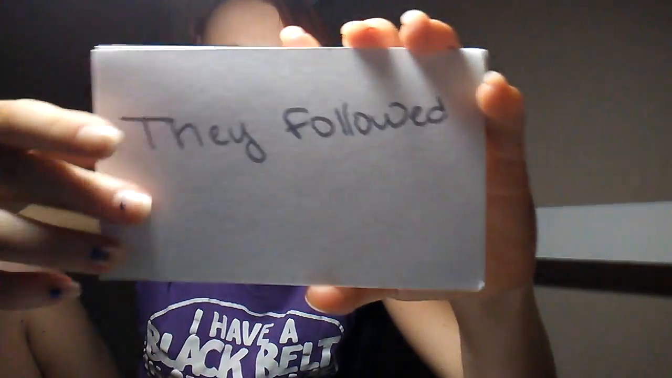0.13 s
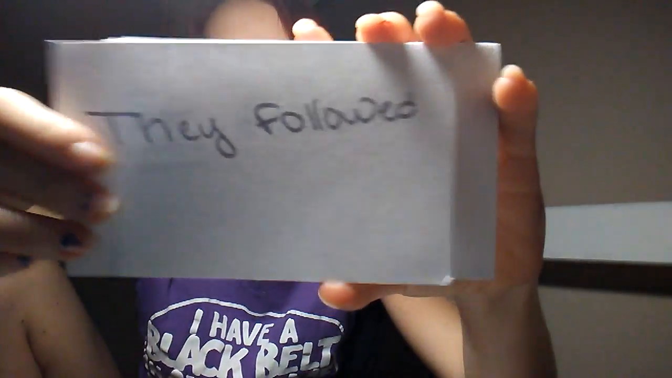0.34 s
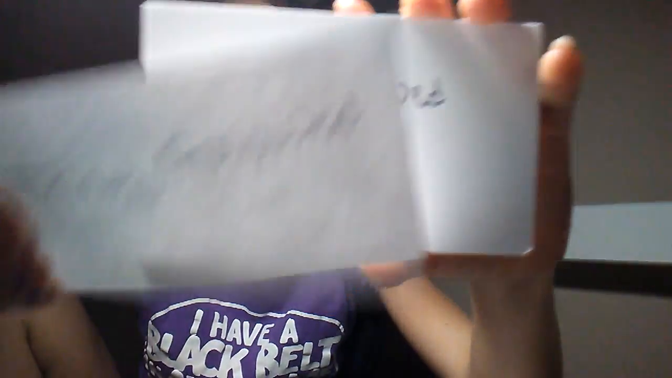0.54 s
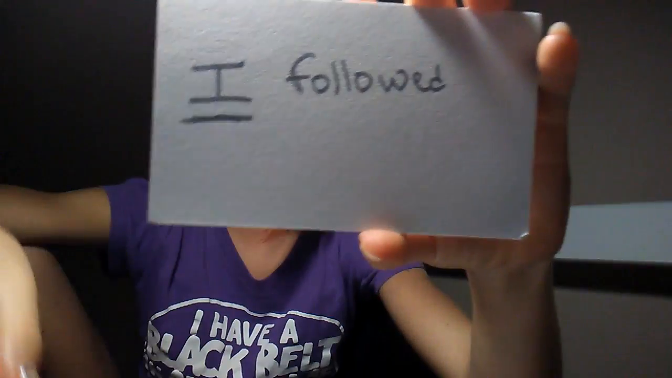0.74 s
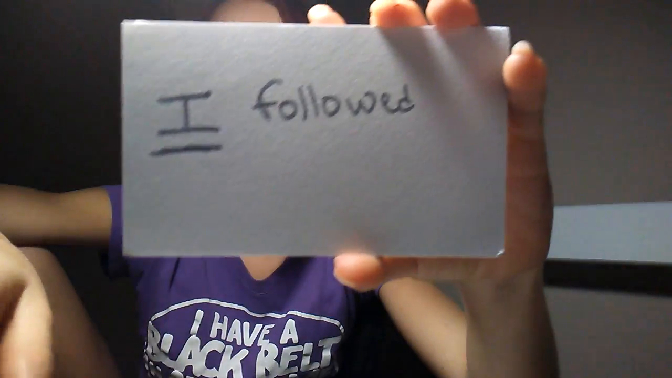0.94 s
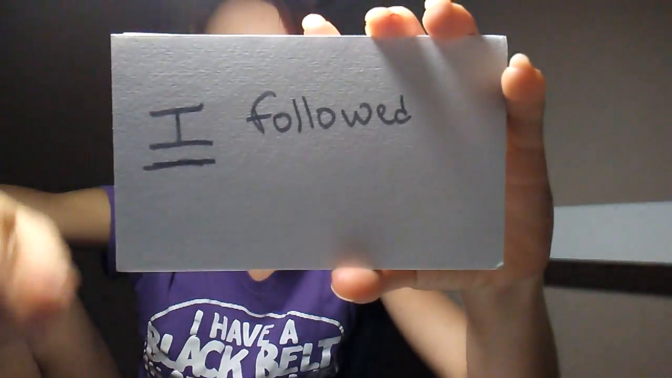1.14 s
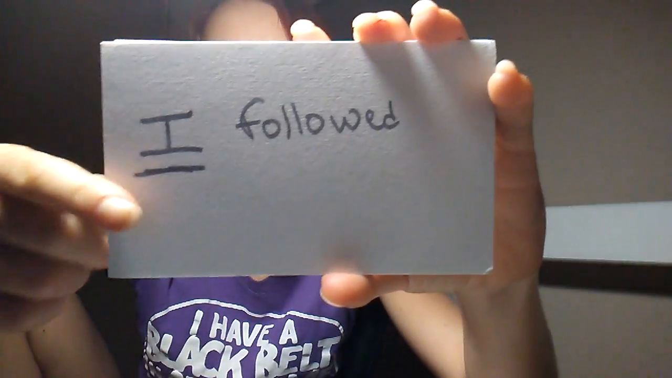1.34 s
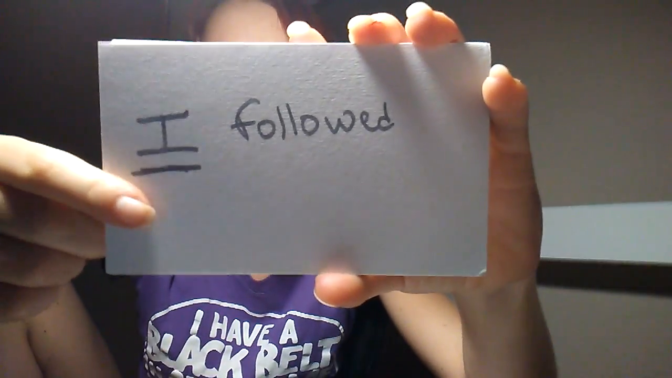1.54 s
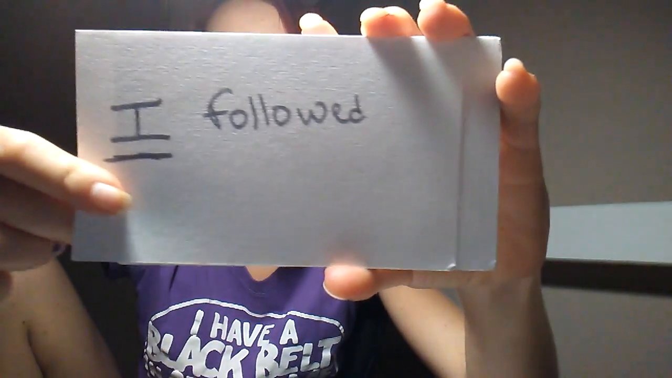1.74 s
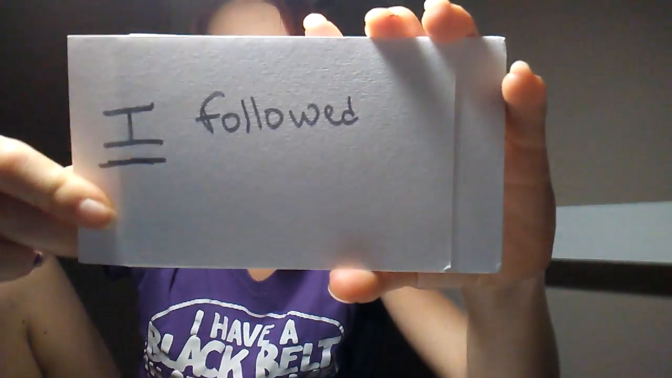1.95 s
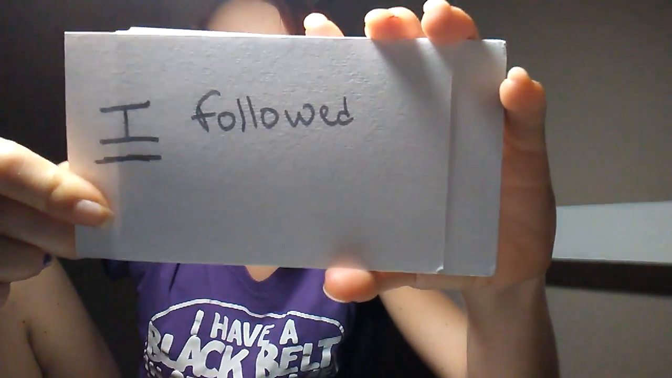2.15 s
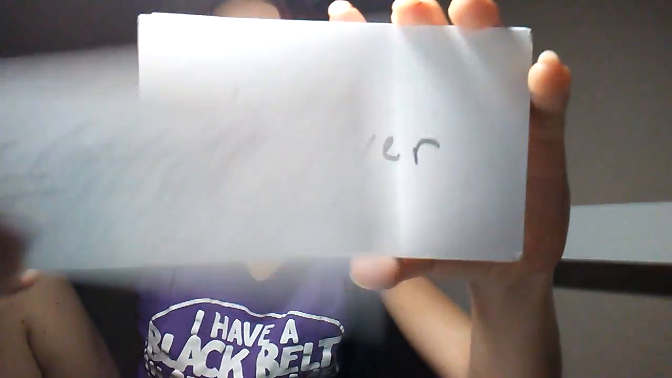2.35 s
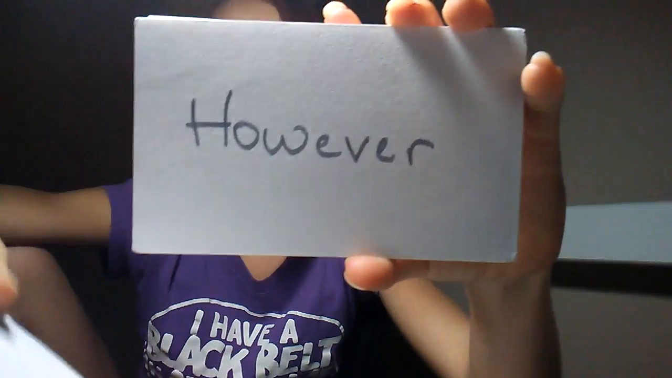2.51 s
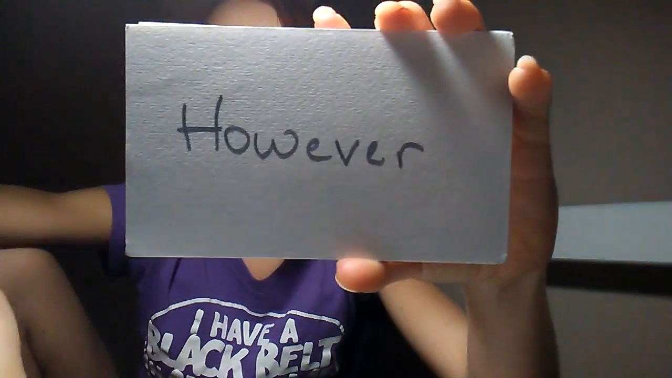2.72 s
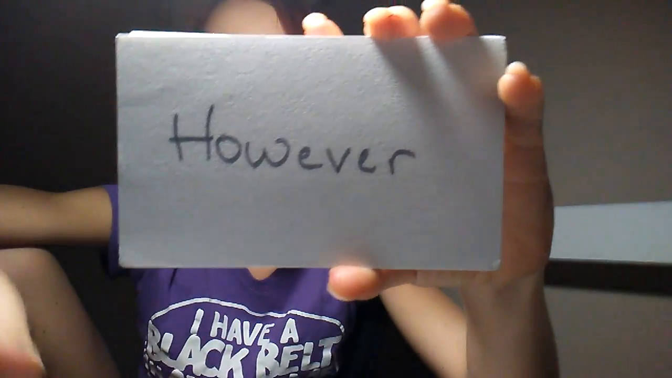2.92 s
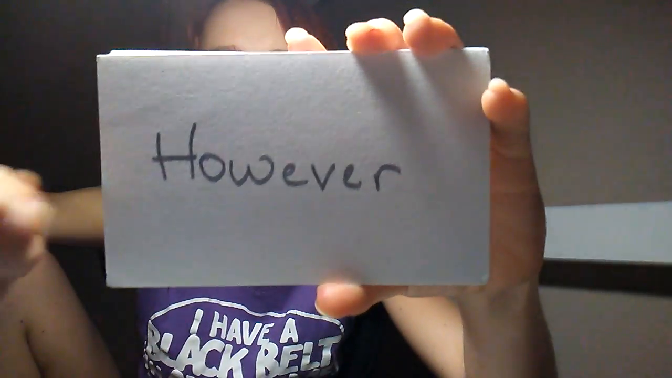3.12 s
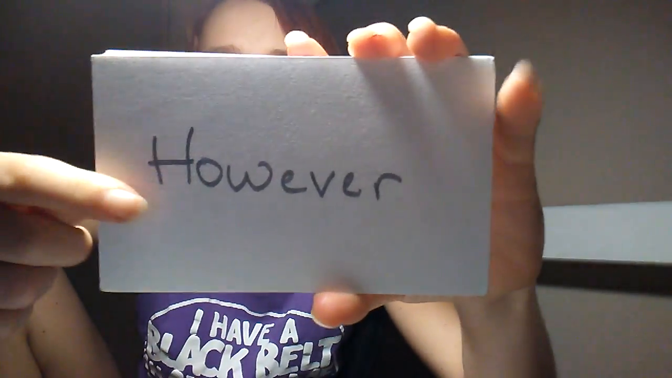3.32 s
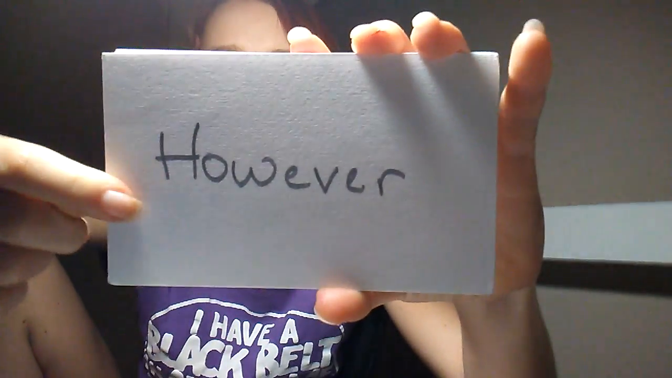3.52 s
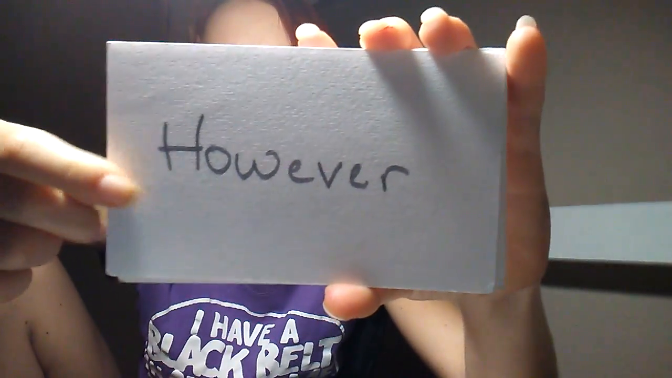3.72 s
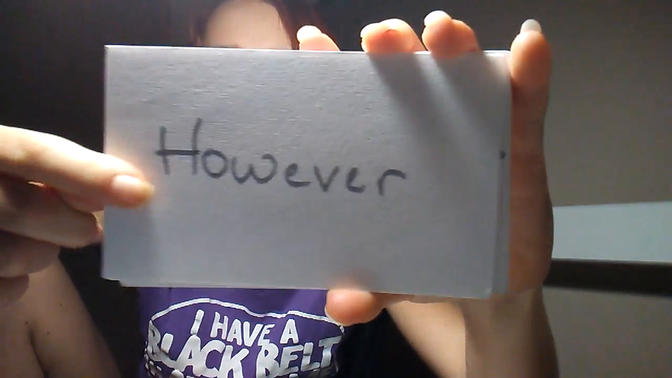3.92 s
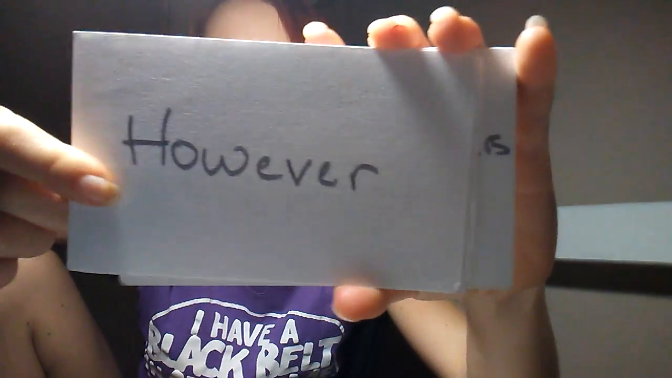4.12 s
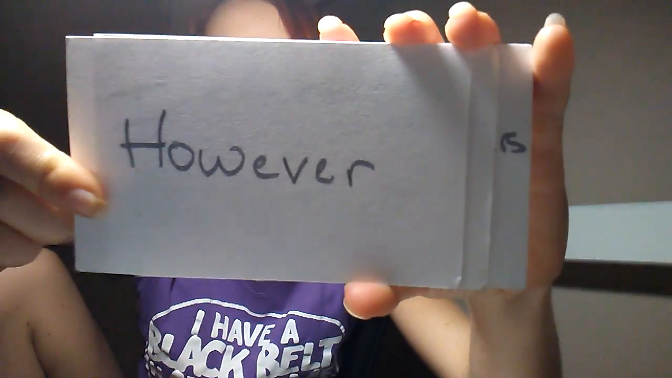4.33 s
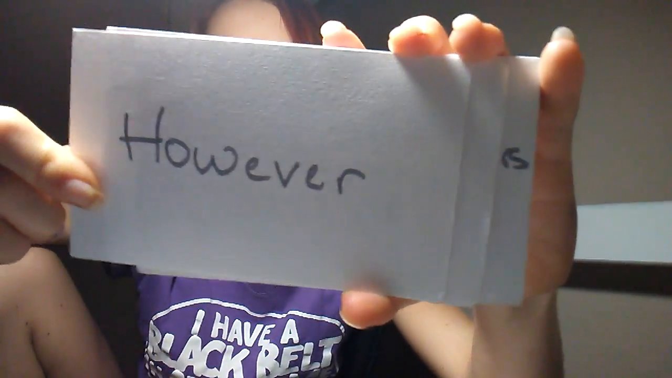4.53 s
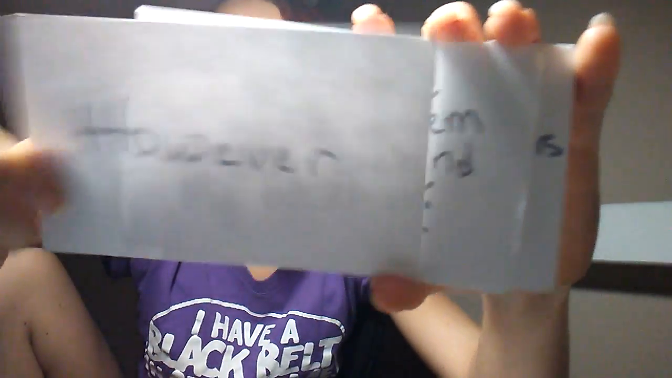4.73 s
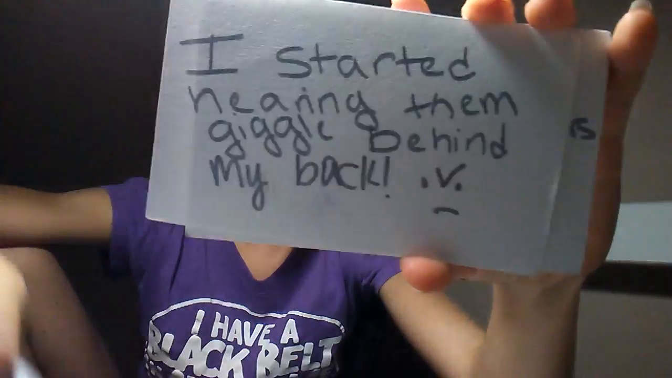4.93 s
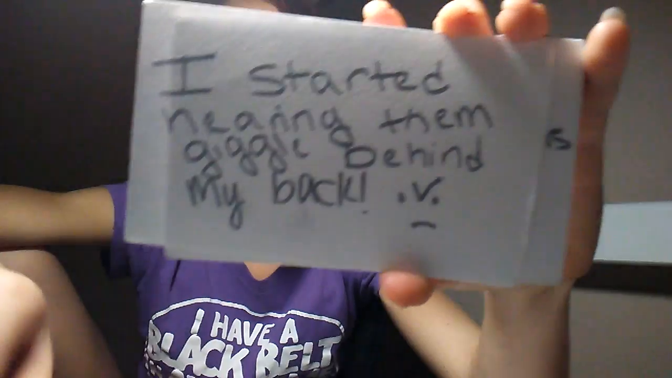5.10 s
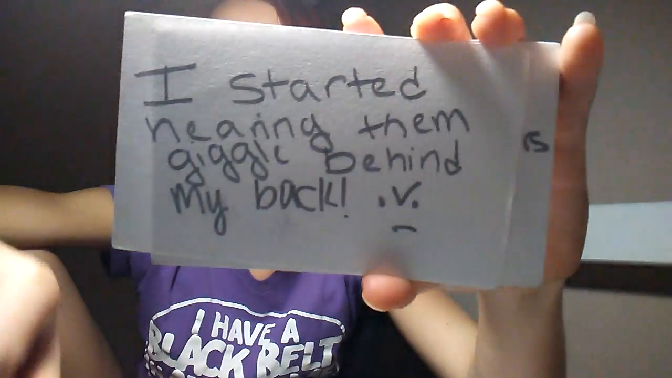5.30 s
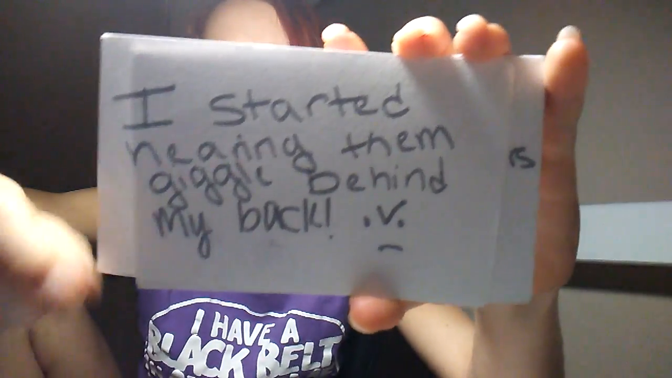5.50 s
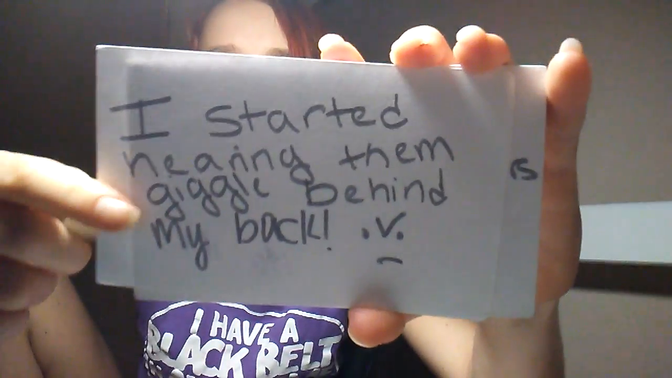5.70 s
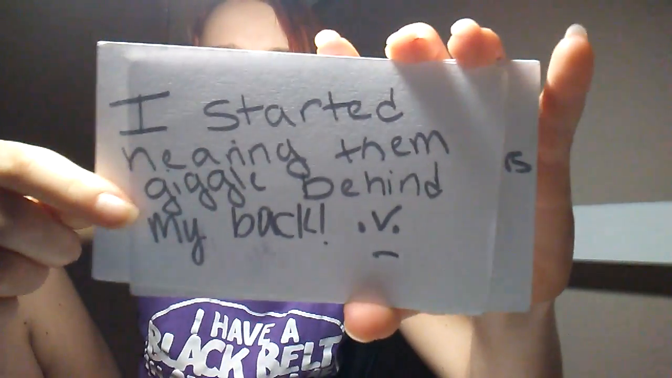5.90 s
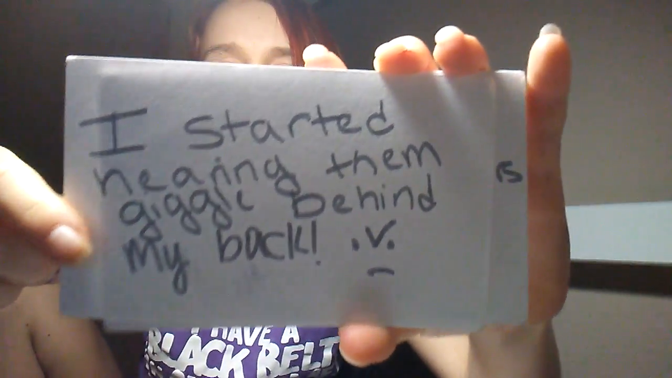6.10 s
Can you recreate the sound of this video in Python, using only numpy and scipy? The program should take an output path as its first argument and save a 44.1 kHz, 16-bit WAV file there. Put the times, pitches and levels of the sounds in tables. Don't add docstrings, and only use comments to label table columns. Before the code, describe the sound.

Close to a small microphone in a quiet, hissing room, fingers brush a stack of stiff paper cards. One drags with a dry crackle and snaps free, then a lull with faint rustling. A second run of slides ends in two quick snaps and low desk thuds. After a quieter pause, a third card snaps loudest, followed by squaring knocks and fading rustle.

```python
import sys
import numpy as np
from scipy import signal
from scipy.io import wavfile
from scipy.ndimage import uniform_filter1d

SR = 44100
rng = np.random.default_rng(int(sys.argv[2]) if len(sys.argv) > 2 else 0)


def gain_from_db(level_db):
    decades = np.asarray(level_db, float) / 20
    return 10 ** decades


def inscribe(sig):
    pcm = np.round(np.clip(np.atleast_2d(sig).T, -1, 1) * 32767)
    wavfile.write(sys.argv[1], SR, pcm.astype(np.int16))


N = 271347

# frequency in Hz, density in dB per Hz.
FIBRE_SPECTRUM = [(2600, -30.5), (3600, -21.5), (4050, -14.5), (4450, -18), (4800, -10.5), (5100, -10),
                  (5550, -8.5), (5850, -0.5), (6150, -6.5), (6600, -11), (6950, -14.5), (7450, -23),
                  (8640, -31.5), (11700, -43)]
# start in seconds, peak in dB,
# low ring in Hz, high ring in Hz, decay t60 in seconds.
BUCKLING_SNAPS = [(0.5814, -27.5, 534, 897, 0.048), (0.586, -22.5, 492, 1415, 0.029),
                  (.589, -20, 737, 1827, 0.029), (.593, -20.5, 529, 1930, 0.018),
                  (0.5955, -21.5, 915, 1770, 0.027), (2.3828, -34, 630, 1200, 0.023),
                  (2.3917, -36, 378, 1124, 0.045), (2.4, -28, 286, 900, 0.014),
                  (2.789, -26, 510, 1280, .01), (2.791, -30.5, 920, 1850, 0.013),
                  (2.795, -28, 519, 490, 0.032), (4.7925, -42.5, 655, 2045, .03),
                  (4.8116, -25.5, 1220, 1986, 0.029), (4.8139, -30, 407, 1560, 0.023)]


def evened(x):
    return x / np.sqrt(np.mean(x ** 2) + 1e-20)


def read(points, hz):
    f, value = np.transpose(points)
    return np.interp(np.log(hz + 1), np.log(f + 1), value)


def colour(x, points, size=4096):
    gain_db = np.maximum(read(points, np.fft.rfftfreq(size, 1 / SR)), -100)
    log_gain = np.log(gain_from_db(gain_db))
    full = np.concatenate([log_gain, log_gain[-2:0:-1]])
    taps = np.fft.ifft(np.exp(np.conj(signal.hilbert(full)))).real
    return signal.oaconvolve(x, taps / np.linalg.norm(taps))[:len(x)]


def add(mix, s, sound):
    part = mix[round(s * SR):][:len(sound)]
    part += sound[:len(part)]


def crackle(per_s, spread_db, clump_db):
    slow_noise = uniform_filter1d(rng.standard_normal(N), size=250)
    clumps = evened(uniform_filter1d(slow_noise, size=250))
    sizes = gain_from_db(spread_db * np.minimum(rng.exponential(1, N), 4) + clump_db * clumps)
    clicks = rng.standard_normal(N) * (rng.random(N) < per_s / SR)
    return evened(sizes * clicks)


def patchy(x, patchy_db, size=256):
    z = signal.stft(x, nperseg=size)[2]
    patches = uniform_filter1d(rng.standard_normal(z.shape), size=8, axis=1)
    patches = evened(uniform_filter1d(patches, size=2, axis=0))
    return evened(signal.istft(z * gain_from_db(patchy_db * patches), nperseg=size)[1][:N])


def swells(peak_s, db, rise_s, fall_s, rounding=1):
    swell_db = 20
    power, t = np.zeros(N), np.arange(N) / SR
    for s, level_db, rise, fall in zip(peak_s, db, rise_s + 0.0031, fall_s + 1e-3):
        near = slice(max(round((s - 3 * rise) * SR), 0), round((s + 3 * fall) * SR))
        late = t[near] - s
        distance = np.maximum(late / fall, -late / rise)
        power[near] += gain_from_db(level_db - swell_db * distance ** rounding) ** 2
    return uniform_filter1d(np.sqrt(power), size=100)


def sliding():
    # peak in seconds,
    # level in dB, rise in seconds, fall in seconds, pressure in dB.
    drags = [(0.374, -51.5, 0.076, 0.087, -15.5), (0.42, -52.5, 0.019, 0.015, -1.5),
             (0.5, -61.5, 0.11, 0.27, -5), (0.578, -52.5, 0.041, 0.041, -10),
             (0.636, -49.5, 0.025, 0.018, -0.5), (1.695, -62.5, 0.0075, 0.11, -25),
             (1.755, -55, 0.035, 0.11, -12), (1.87, -63, 0.051, 0.075, -11),
             (2.305, -53.5, 0.045, .03, -9.5), (2.335, -47, 0.039, 0.032, -9),
             (2.365, -47.5, 0.03, 0.03, -11), (2.382, -47.5, 0.019, .012, -4),
             (2.398, -44, 0.01, 0.013, -1.5), (2.423, -57.5, .01, 0.014, 3), (2.45, -74.5, 0.033, 0.15, 2),
             (2.703, -52, 0.0069, 0.068, -5), (2.725, -55, .015, .03, 2), (2.752, -48.5, .02, .025, -1),
             (2.772, -45.5, 0.015, 0.029, -1.5), (2.795, -49, 0.013, 0.036, 3),
             (2.825, -58, .03, 0.04, -1.5), (4.05, -77, 0.16, 0.25, 0), (4.12, -68.5, 0.055, .08, -11),
             (4.265, -59.5, 0.14, 0.049, -11.5), (4.62, -63, 0.033, 0.32, -10.5),
             (4.75, -57.5, 0.16, 0.12, -12), (4.795, -49.5, 0.021, 0.063, -12),
             (4.845, -64.5, 0.059, 0.046, -4)]
    # peak in seconds, level in dB,
    # rise in seconds, fall in seconds, pressure in dB.
    brushes = [(0.1, -72, 0.016, .03, 1), (0.27, -71.5, 0.77, 0.044, -6), (0.77, -70, 0.14, 0.16, 0),
               (0.932, -62.5, 0.067, 0.099, -5.5), (1.028, -58.5, 0.0052, 0.13, -5.5),
               (1.174, -74, 0.073, 0.12, 0.5), (1.98, -52, 0.016, 0.023, -2), (2.03, -76.5, .05, 0.26, 2),
               (2.86, -70.5, .03, 0.22, 2), (3.752, -61.5, 0.016, 0.024, -17), (4.42, -71, .05, 0.46, -3),
               (5.066, -47.5, 0.012, 0.075, -5), (5.035, -63, 0.03, .04, 1),
               (5.18, -55.5, 0.03, 0.097, -0.5), (5.215, -63, .02, .03, 6), (5.288, -63.5, 0.037, 0.13, -6),
               (5.64, -74, 0.066, 0.28, 1)]
    # peak in seconds, level in dB,
    # rise in seconds, fall in seconds.
    flexes = [(0.27, -67.5, .25, 0.054), (0.425, -58, 0.029, 0.035), (0.53, -67, 0.37, .1),
              (0.596, -32, 0.022, 0.049), (.635, -38, .02, .02), (0.652, -42, .02, 0.017),
              (0.69, -64.5, .03, 0.21), (0.936, -54, 0.077, 0.091), (1.024, -56.5, .02, 0.21),
              (1.19, -62, .03, 0.11), (1.984, -60, .015, 0.042), (2.04, -72, .05, 0.13),
              (2.3, -62, 0.16, 0.27), (2.394, -33.5, 0.012, 0.035), (2.46, -64.5, .05, 0.74),
              (2.704, -53.5, 0.0084, 0.29), (2.797, -35.5, 0.008, 0.027), (2.785, -49, .01, .01),
              (1.78, -72, 0.087, 0.13), (2.86, -73, 0.044, .12), (3.072, -62.5, .003, 0.08),
              (4.3, -61.5, 0.084, 0.44), (4.417, -51, 0.024, 0.013), (4.5, -65.5, 0.24, 0.72),
              (4.7, -67, 0.19, 0.29), (4.815, -26, 0.0047, 0.021), (4.84, -49, .015, 0.029),
              (0.567, -37.5, 0.0058, 0.043), (5.035, -57, 0.022, .05), (4.89, -64, .05, 0.16),
              (5.072, -48, 0.033, 0.052), (5.015, -57.5, 0.0055, .15), (5.178, -45, 0.035, 0.088),
              (5.288, -57, 0.049, 0.063), (5.68, -65, 0.15, 0.12)]
    # frequency in Hz, density in dB per Hz.
    pressed_spectrum = [(880, -39), (1500, -15), (1930, -3), (2350, -13), (2750, -2), (3300, -1.5),
                        (4000, -3), (4420, -8), (4750, -11.5), (5000, -17), (6500, -35), (11000, -120)]
    # frequency in Hz, density in dB per Hz.
    body_spectrum = [(110, -21), (180, -5), (323, 2), (529, 2), (939, 0), (1270, -7), (1450, -12.5),
                     (2000, -13), (2600, -53.5), (4400, -120)]
    # frequency in Hz, density in dB per Hz.
    fast_spectrum = [(3000, -30), (4100, -10.5), (4500, -17.5), (4900, 1), (5400, -3), (6500, 0),
                     (7200, -8), (9000, -30.5)]

    slips = patchy(crackle(9000, 0.61, 0.67), patchy_db=1.8)
    fizz, scrape = np.zeros((2, N))
    for rows, rounding in (drags, 1.87), (brushes, 1):
        s, db, rise, fall, pressure_db = np.transpose(rows)
        fizz = np.hypot(fizz, swells(s, db, rise, fall, rounding))
        scrape = np.hypot(scrape, swells(s, db + pressure_db, rise, fall, rounding))
    wide = gain_from_db(-12.5) * (fizz * gain_from_db(46)) ** 0.25 * colour(slips, fast_spectrum)
    surface = gain_from_db(-4.5) * fizz * (colour(slips, FIBRE_SPECTRUM) + wide)
    pressed = gain_from_db(-4.0) * scrape * colour(slips, pressed_spectrum)
    rattle = patchy(crackle(2500, 1.77, 2.4), patchy_db=4.0, size=512)
    body = gain_from_db(-7.5) * swells(*np.transpose(flexes)) * colour(rattle, body_spectrum)
    return surface + pressed + body


def streaks():
    # middle in seconds, peak in dB, pitch in Hz, length in seconds.
    streak_table = [(.572, -53, 6000, 0.022), (0.576, -49, 5200, 0.011), (.586, -47, 5300, .01),
                    (0.628, -51, 3000, .025), (0.6393, -43, 6680, .008), (.64, -43, 5260, .012),
                    (0.641, -40, 2040, .008), (0.638, -42.5, 5850, 0.012), (.639, -40, 4480, .008),
                    (.641, -38, 2900, .008), (0.654, -45, 1996, .015), (.38, -50.5, 5880, .05),
                    (1.759, -60, 5900, .05), (1.795, -51, 5900, .012), (1.89, -58.5, 5800, .02),
                    (1.984, -52, 5850, 0.027), (2.3, -50, 5900, .025), (2.303, -54, 3720, 0.019),
                    (2.318, -46, 5200, 0.035), (2.342, -42, 4310, 0.01), (2.351, -46, 5480, .01),
                    (2.362, -44, 5200, 0.022), (2.386, -50, 3970, 0.036), (2.393, -41, 5240, .01),
                    (2.403, -47, 6620, 0.0082), (2.407, -43, 3710, 0.011), (2.703, -46, 5740, .02),
                    (2.708, -53, 4200, .02), (2.722, -53.5, 2020, 0.021), (2.724, -51, 3780, .015),
                    (2.742, -50.5, 3220, 0.026), (2.75, -43.5, 5900, .02), (2.77, -43, 6320, 0.019),
                    (2.777, -48, 2890, .035), (2.779, -48, 5340, .01), (2.793, -42, 5950, 0.01),
                    (4.078, -62.5, 5940, .012), (4.145, -61, 5900, 0.014), (4.16, -57, 6040, .012),
                    (4.207, -63, 5920, 0.042), (4.258, -54, 5900, .015), (4.281, -60, 5700, .015),
                    (4.8, -48, 4100, .012), (4.815, -41, 3110, .006), (4.842, -51.5, 2000, .05),
                    (4.863, -51, 1607, .015), (2.788, -38.5, 523, 0.016), (4.83, -52, 4030, 0.013),
                    (4.703, -64, 4140, .06), (0.649, -37, 892, 0.023), (5.213, -57.5, 5900, 0.048),
                    (5.3, -66, 5800, .05)]
    out = np.zeros(N)
    for s, db, hz, length in streak_table:
        t = np.arange(0, length, 1 / SR)
        grain = uniform_filter1d(rng.standard_normal(4000), size=32)
        rough = 1 + 1.1 * evened(uniform_filter1d(grain, size=32))[:len(t)]
        tone = np.hanning(len(t)) * rough * np.sin(2 * np.pi * hz * t)
        add(out, s - t[-1] / 2, gain_from_db(db - 5.0) * tone)
    return out


def pops():
    # start in seconds, peak in dB,
    # low ring in Hz, high ring in Hz, decay t60 in seconds.
    flex_pops = [(.558, -42.5, 495, 943, 0.046), (.929, -51, 324, 1116, 0.069),
                 (1.171, -56, 767, 1100, 0.091), (2.703, -54, 362, 1970, 0.063),
                 (4.321, -57.5, 885, 1900, 0.016), (4.365, -47, 276, 710, 0.029),
                 (4.412, -49.5, 263, 1315, 0.032), (5.0075, -51, 586, 936, 0.054),
                 (5.041, -48.5, 513, 698, 0.098), (5.064, -49, 267, 1017, 0.12),
                 (5.075, -42, 910, 4010, 0.03), (5.165, -53, 780, 1100, 0.045),
                 (5.6695, -47.5, 264, 1090, 0.017), (5.671, -54, 2070, 2930, 0.02)]
    # start in seconds, peak in dB, ring in Hz, decay t60 in seconds.
    single_rings = [(0.416, -49.5, 336, 0.077), (.524, -43, 1130, 0.034), (.602, -33, 1100, 0.07),
                    (.641, -42, 880, 0.035), (.903, -45.5, 452, 0.067), (1.976, -41.5, 1200, 0.032),
                    (1.9779, -31.5, 1810, 0.02), (2.419, -33.5, 253, 0.024), (2.46, -47.5, 200, 0.173),
                    (2.7943, -40, 333, 0.011), (2.799, -28, 254, 0.05), (2.815, -31.5, 167, 0.038),
                    (3.07, -50, 180, 0.059), (3.068, -60, 750, 0.016), (3.549, -57, 1193, 0.026),
                    (4.27, -57, 725, 0.057), (4.813, -26, 3990, 0.02), (4.8195, -43, 240, 0.03),
                    (4.836, -38, 249, 0.044), (5.015, -45, 590, 0.068)]
    # start in seconds, peak in dB, ring in Hz,
    # decay t60 in seconds.
    desk_thuds = [(0.59, -46, 127, 0.11), (2.894, -41.5, 66.5, 0.27), (3.08, -49, 74.5, 0.29),
                  (4.85, -43, 170, 0.04), (0.409, -57.5, 130, 0.084), (4.815, -38, 121, 0.083),
                  (5.275, -45, 92, .12), (1.24, -62.5, 180, 0.24), (5.18, -52, 240, 0.093),
                  (0.087, -60, 185, 0.15), (2.6, -58, 140, .08), (2.1, -59.5, 70, 0.16),
                  (3.1, -61, 109, 0.082), (2.92, -43.5, 75, 0.15)]
    # frequency as a multiple of the main ring, level in dB.
    card_modes = [(0.621, -6), (0.899, -18.5), (1.002, 4.5), (1.167, -7.5), (1.9, -13)]

    out, t = np.zeros(N), np.arange(6000) / SR
    multiple, mode_db = np.transpose(card_modes)[:, :, None]
    rings = single_rings + desk_thuds
    for s, db, low, high, t60 in BUCKLING_SNAPS + flex_pops:
        rings = rings + [(s, db, low, t60), (s, db + 0.087, high, 1.09 * t60)]
    for s, db, hz, t60 in rings:
        phase, detune = rng.random((2, len(card_modes), 1))
        cycles = hz * multiple * (.97 + 0.0746 * detune) * t + 0.53 * hz * 0 + 0.53 * phase
        modes = gain_from_db(mode_db - 60 * t / t60) * np.sin(2 * np.pi * cycles)
        onset = np.minimum(t / max(0.00075, 0.25 / hz), 1)
        add(out, s + 0.001648, gain_from_db(db - 6.5) * modes.sum(0) * onset)
    return signal.sosfilt(signal.butter(4, 4300, fs=SR, output="sos"), out)


def cracks():
    out, t = np.zeros(N), np.arange(3000) / SR
    for s, db, *_ in BUCKLING_SNAPS:
        decay = gain_from_db(db - 21 - 60 * t / .04)
        add(out, s + 0.00177, decay * rng.standard_normal(3000))
    return signal.sosfilt(signal.butter(5, [1200, 4000], "band", fs=SR, output="sos"), out)


def puffs():
    # pulse centre in seconds, peak in dB, pitch in Hz.
    puff_table = [(0.5837, -27, 330), (2.387, -44, 300), (2.401, -48, 230), (2.415, -41.5, 300),
                  (2.436, -50, 190), (2.7972, -30, 330), (2.8009, -32.5, 300), (2.811, -37.5, 200),
                  (3.0725, -55, 600), (3.077, -53, 170), (3.089, -49, 129.7), (3.122, -53, 110),
                  (3.136, -53, 110), (4.814, -16, 1640), (4.8188, -29.5, 327), (4.8232, -25, 230),
                  (4.839, -41, 230), (4.855, -55, 120), (5.284, -48.5, 110)]
    out = np.zeros(N)
    for s, db, hz in puff_table:
        u = np.pi * np.arange(-1 / hz, 1 / hz, 1 / SR) * hz
        add(out, s - 1 / hz, gain_from_db(db) * (1 - 2 * u ** 2) * np.exp(-u ** 2))
    return out


def ticks():
    # start in seconds, peak in dB, decay t60 in seconds,
    # level of the duller part in dB, its pitch in Hz.
    knocks = [(0.5249, -40, 0.031, -24, 1090), (0.638, -37, 0.04, -10, 1810),
              (0.6915, -48.5, 0.07, -16, 1755), (0.9271, -35, 0.029, -14.5, 1030),
              (1.1722, -54, 0.042, -21.5, 1038), (1.9815, -35, 0.02, -6, 1610),
              (2.58, -42.5, 0.049, -19, 1910), (2.7012, -44, 0.033, -13, 2040),
              (2.791, -28, 0.033, -15.5, 2760), (3.5855, -55.5, 0.021, -6, 1690),
              (3.65, -56, 0.027, -25, 1610), (3.7492, -60.5, 0.025, -11, 1610),
              (4.321, -44.5, 0.022, -26, 880), (4.4164, -25, 0.01, -17, 1220),
              (5.008, -49.5, 0.042, -10.5, 2700), (5.058, -41, 0.05, -18, 1060),
              (5.1792, -41, 0.038, -11, 1004), (5.2031, -51, 0.086, -20, 930),
              (5.281, -44.5, 0.03, -26, 920), (5.672, -41.5, 0.027, -8, 2390)]
    # start in seconds, peak in dB, decay t60 in seconds.
    dry_ticks = [(0.109, -39.5, 0.027), (0.167, -54, 0.02), (0.2295, -51, 0.076), (0.2716, -49.5, 0.066),
                 (0.4157, -34.5, 0.06), (1.0259, -40.5, 0.028), (2.6833, -45.5, 0.021),
                 (2.746, -34.5, 0.048), (4.1422, -48.5, 0.024), (4.235, -46, 0.036), (4.368, -30, 0.019),
                 (4.7926, -34, 0.016), (2.765, -35, 0.071), (5.04, -53, .03), (2.2948, -46, 0.033),
                 (2.3354, -37, .02), (2.3785, -43, .025), (2.403, -36, .02), (2.716, -50, .03),
                 (4.275, -55.5, .02), (4.16, -51, .02)]
    bright, dull, t = np.zeros(N), np.zeros(N), np.arange(3000) / SR
    rows = knocks + [row + (-26.5, 1100) for row in dry_ticks]
    for s, db, t60, dull_db, hz in rows:
        noise = rng.standard_normal(3000)
        envelope = gain_from_db(db - 60 * t / t60) * np.minimum(t / 0.00034, 1)
        add(bright, s, envelope * noise)
        rough = 0.62 + 1.05 * evened(uniform_filter1d(noise, size=30))
        add(dull, s, gain_from_db(dull_db) * envelope * rough * np.sin(2 * np.pi * hz * t))
    return gain_from_db(-10.5) * colour(bright, FIBRE_SPECTRUM) + gain_from_db(2.0) * dull


def squeak():
    # start in seconds, peak in dB, pitch in Hz, length in seconds.
    s, db, hz, length = (5.129, -73, 14030, .036)
    out, t = np.zeros(N), np.arange(0, length, 1 / SR)
    add(out, s, gain_from_db(db) * np.hanning(len(t)) ** .4 * np.sin(2 * np.pi * hz * t))
    return out


def bumps():
    # peak in seconds, level in dB, fall in seconds.
    bump_table = [(0.02, -52, 1), (0.25, -53, 0.22), (0.41, -44.5, .1), (0.53, -50.5, 0.29),
                  (0.665, -37, .05), (1.044, -47, .05), (1.14, -54.5, 0.55), (1.47, -60, 0.85),
                  (1.98, -54, 0.18), (2.14, -53, 0.074), (2.302, -48, 0.14), (2.462, -40.5, 0.15),
                  (2.74, -62, .06), (5.4, -48, 0.091), (.88, -57, .08), (2.82, -38, 0.29),
                  (2.916, -38.5, 0.12), (3.14, -45, 0.23), (3.4, -51, 0.5), (3.65, -48, 0.53),
                  (4.086, -55, 0.059), (4.52, -50, 0.081), (4.664, -53.5, 0.18), (4.815, -31, 0.064),
                  (4.87, -47, 0.22), (5.034, -53, 1), (5.17, -49, 0.15), (5.27, -36.5, 0.2),
                  (5.65, -55.5, 0.79), (5.946, -52.5, 0.24), (6.14, -49.5, 0.13)]
    # frequency in Hz, density in dB per Hz.
    desk_spectrum = [(18, -51), (30, -13.5), (48, -7.5), (73, -1.5), (94, -8), (124, -6), (167, -12),
                     (216, -25), (350, -25.5), (460, -57), (770, -120)]
    s, db, fall = np.transpose(bump_table)
    rumble = colour(crackle(900, 0.75, 1.0), desk_spectrum, size=16384)
    return gain_from_db(-17.0) * swells(s, db, 0.59 * fall, fall) * rumble


def room(x):
    # frequency in Hz, decay t60 in seconds.
    room_decay = [(150, 0.2), (1000, 0.18), (6000, 0.18)]
    taps = np.zeros(SR // 2)
    at = np.arange(120, len(taps) - 20, 20)
    taps[at + rng.integers(0, 20, len(at))] = rng.choice([-1., 1.], len(at))
    hz, t, z = signal.stft(taps, SR, nperseg=256)
    decay = gain_from_db(-60 * t / read(room_decay, hz)[:, None])
    tail = signal.istft(z * decay, SR, nperseg=256)[1]
    return signal.fftconvolve(x, tail / np.linalg.norm(tail))[:N]


def scene():
    cards = sliding() + ticks() + pops() + cracks() + puffs() + streaks()
    return (cards + gain_from_db(-14.5) * room(cards) + bumps() + squeak())[None]


def roll_off(x):
    return signal.sosfilt(signal.butter(12, 15850, fs=SR, output="sos"), x)


def record(dry):
    # frequency in Hz, density in dB per Hz.
    tone_spectrum = [(12, -26), (20, -9.5), (27, -28), (107, -6), (464, -13.5), (505, -11), (549, -13.5),
                     (784, -17), (871, -18), (3000, -23.5), (3900, -69.5), (6600, -120)]
    # frequency in Hz, density in dB per Hz.
    hiss_spectrum = [(1760, -28.5), (3000, -3), (3490, 0.5), (4600, -4), (4960, -3), (9630, -7),
                     (15600, -1.5)]
    # frequency in Hz, density in dB per Hz.
    grit_spectrum = [(3000, -11.5), (7000, -2), (9500, -6.5), (13000, -6), (15700, -4.5)]
    cut = signal.sosfilt(signal.butter(4, 55, "high", fs=SR, output="sos"), dry)
    tone = gain_from_db(-72.0) * colour(rng.standard_normal(N), tone_spectrum, size=16384)
    hiss = gain_from_db(-74.5) * colour(rng.standard_normal(N), hiss_spectrum)
    treble_power = abs(uniform_filter1d(np.diff(cut[0], prepend=0) ** 2, size=1200))
    grit = gain_from_db(-48.5) * treble_power ** 0.19 * colour(rng.standard_normal(N), grit_spectrum)
    band_limit = signal.firwin(511, 15840, window=("kaiser", 9), fs=SR)
    mix = signal.oaconvolve(cut + tone + hiss + grit, band_limit[None], "same")
    return roll_off(mix)


dry = scene()
out = record(dry)
inscribe(out)
```